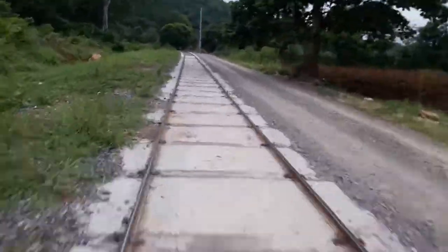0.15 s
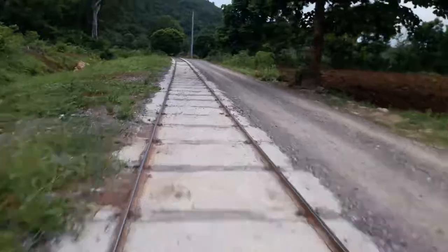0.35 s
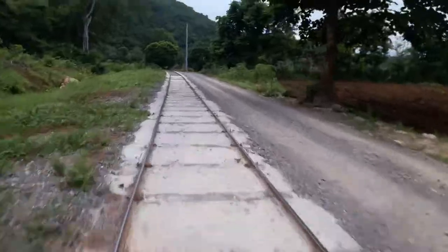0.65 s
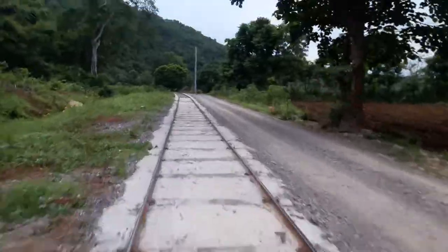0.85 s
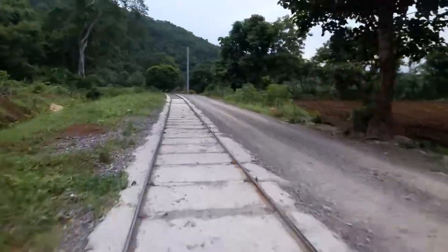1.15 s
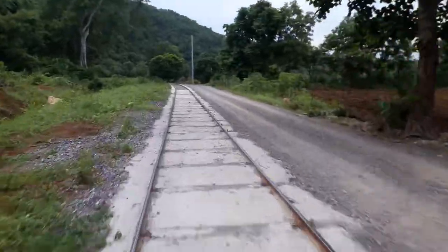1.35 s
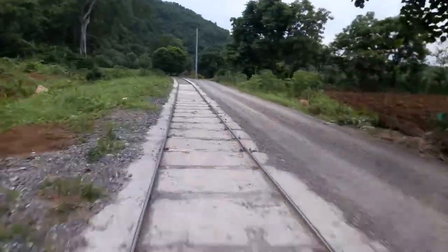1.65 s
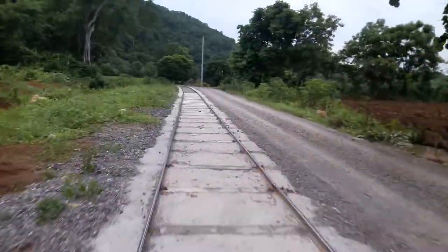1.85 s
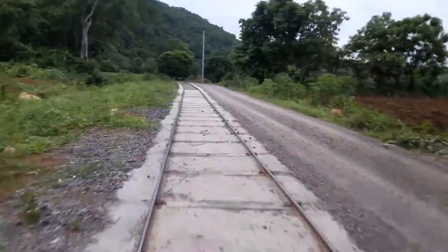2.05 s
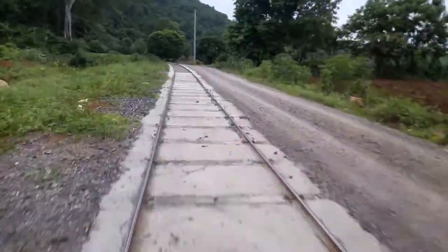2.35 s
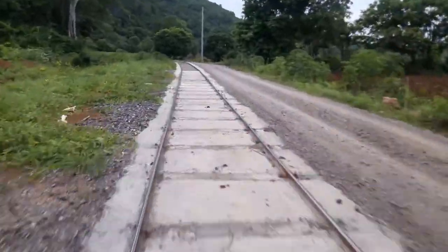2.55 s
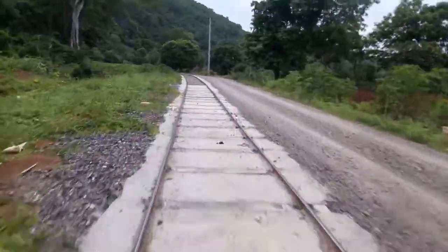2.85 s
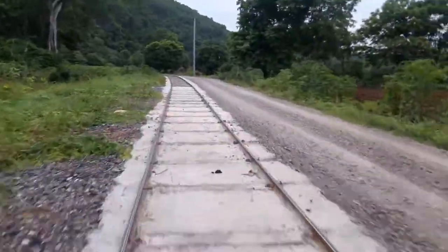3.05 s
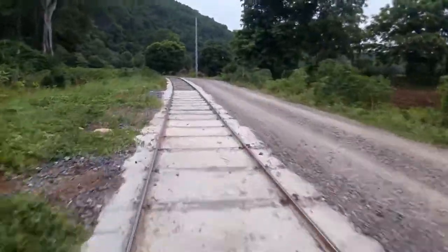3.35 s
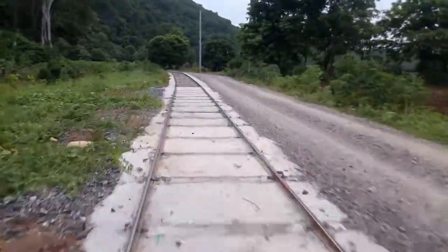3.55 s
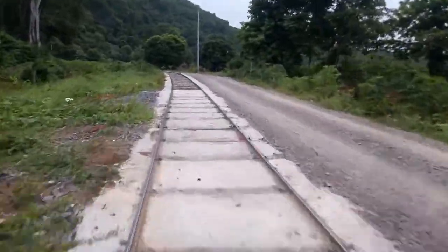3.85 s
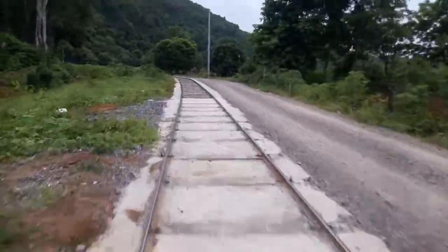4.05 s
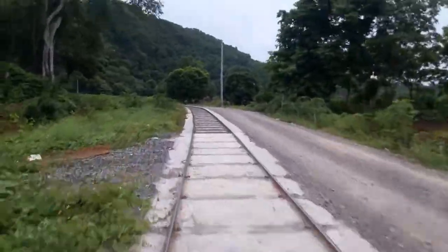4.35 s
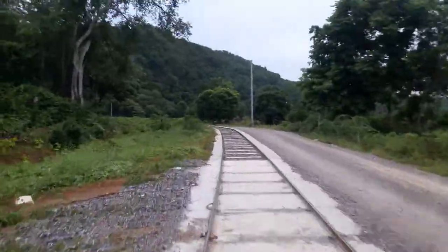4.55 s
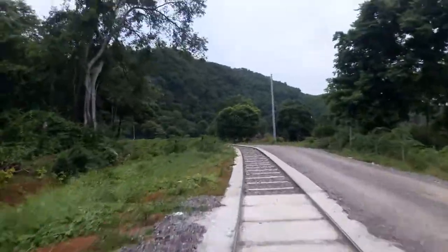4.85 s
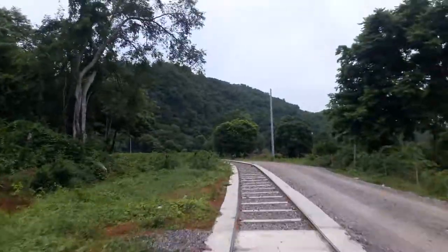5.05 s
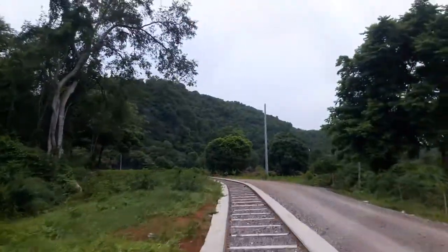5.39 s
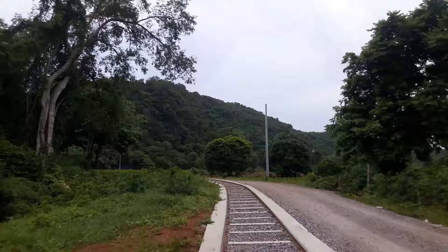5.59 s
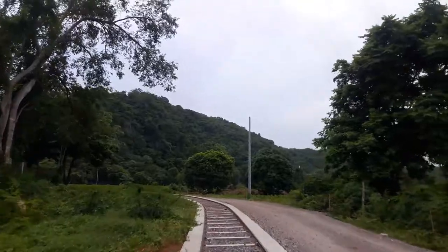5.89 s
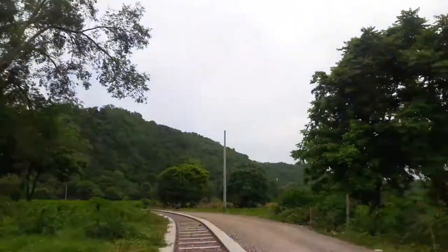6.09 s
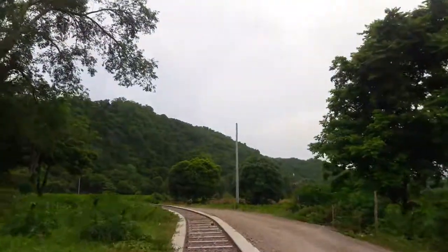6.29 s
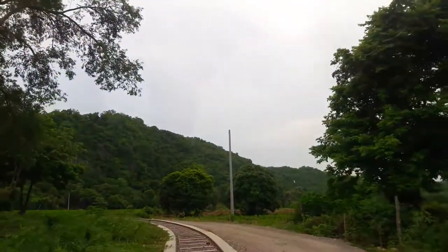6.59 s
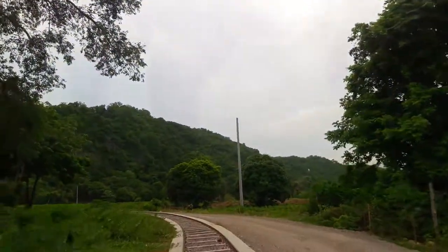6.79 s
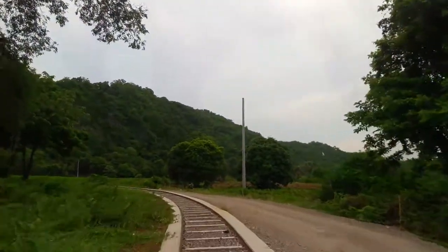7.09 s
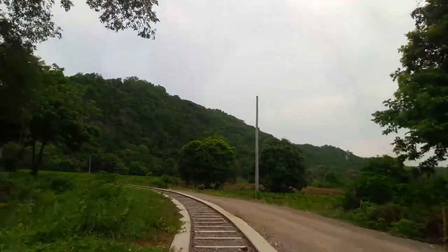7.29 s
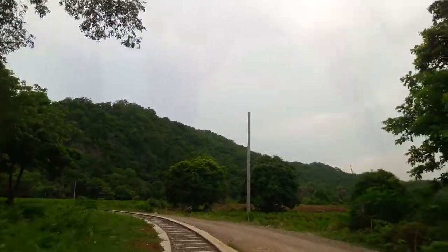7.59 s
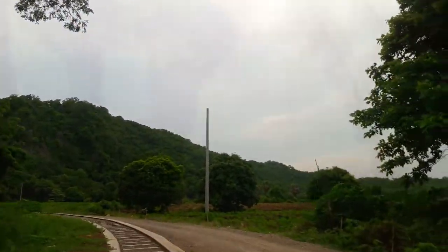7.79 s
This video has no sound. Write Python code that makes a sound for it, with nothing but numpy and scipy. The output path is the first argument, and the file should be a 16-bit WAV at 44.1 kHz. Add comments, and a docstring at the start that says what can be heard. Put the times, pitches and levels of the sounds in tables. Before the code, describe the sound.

Continuous low, dull rolling of steel wheels on rails, close and outdoors, with little treble. Thuds and small metallic clacks come unevenly, many per second. The ride quiets slightly, then a loose fitting rattles, the frame drone rises, a very faint thin squeal passes in the bend, and a rough jolt booms and buzzes before the heavy rumble carries on.

```python
"""A small open rail cart rolls on steel wheels: deck rumble, frame drone and tread hiss are shaped noise.
Decaying frame modes make the bumps, about eight a second; noise bursts through wheel modes make the clacks.
A loose part buzzes under uneven taps, a fitting chatters on one bright mode, and the boards boom softly.
Flanges scrape, and squeal thinly in a bend; a faint high rustle comes and goes over a steady hiss.
All is heard through a muffled phone on board, with rounded peaks and no top treble."""
import sys
import numpy as np
from scipy import signal
from scipy.fft import rfft, irfft, next_fast_len
from scipy.io import wavfile
from scipy.ndimage import uniform_filter1d, map_coordinates

SR = 44100
rng = np.random.default_rng(int(sys.argv[2]) if len(sys.argv) > 2 else 0)


def file_out(sig):
    """Save sig as 16-bit WAV at sys.argv[1]."""
    # one column per channel
    cols = np.atleast_2d(sig).T
    # limit, then scale
    lim = np.clip(cols, -1, 1)
    pcm = np.round(lim * 32767).astype(np.int16)
    wavfile.write(sys.argv[1], SR, pcm)


N = 349713

# Rolling over time. Each row: time in seconds, deck rumble in dB, frame drone in dB before a 3 dB cut,
# high tread hiss in dB.
ROLL = [(0.0, -23.5, -28.5, -46), (0.4, -25, -33, -46), (0.84, -27.5, -33, -45), (1.19, -25, -28, -50.5),
        (1.66, -27.5, -33, -48.5), (2.21, -27.5, -30.5, -49), (3.03, -29, -33, -48.5),
        (3.95, -26.5, -33, -52), (4.33, -24.5, -32, -47), (4.73, -25, -26, -45), (5.06, -21.5, -25.5, -44),
        (5.5, -22, -26, -52.5), (6.2, -20.5, -21, -52.5), (6.38, -15, -19.5, -48.5),
        (6.52, -13, -18.5, -44.5), (6.82, -19.5, -22.5, -52), (7.6, -20, -28, -57),
        (7.93, -20.5, -25.5, -50.5)]
# Low part of the tread hiss. Each row: time in seconds, level in dB.
LOW_HISS = [(0.0, -36), (0.66, -36.5), (1.59, -41.5), (1.87, -41.5), (2.54, -44.5), (2.8, -41),
            (4.09, -40.5), (4.44, -40.5), (5.7, -35.5), (6.18, -41), (6.65, -41), (6.98, -38.5),
            (7.77, -39), (7.93, -39.5)]
# Axle thrum. Each row: time in seconds, level in dB.
THRUM = [(0, -38), (1.2, -42), (3.8, -42), (4.7, -36), (7.93, -37)]
# Noise colours of deck, frame drone and treads. Each row: frequency in Hz, relative density in dB.
DECK_COLOUR = [(12, -55), (20, -35), (56, -2.5), (103, -1.5), (134, -1), (167, -2.5), (320, -8.5),
               (420, -34.5), (700, -120)]
DRONE_COLOUR = [(110, -33), (190, -14.5), (366, -1.5), (403, -4), (449, -3), (513, -5.5), (554, -11.5),
                (800, -22.5), (1040, -43), (1760, -120)]
TREAD_COLOUR = [(290, -36), (500, -6), (630, -8.5), (922, -9.5), (1180, -13), (1370, -12), (2700, -18.5),
                (2890, -20), (3380, -35.5), (3610, -36), (4690, -55.5), (7940, -120)]
# Centre pitches of the small ticking fittings, in Hz.
FITTINGS_HZ = [909, 1039, 1415, 1751, 2086, 2750]
# A boom of the boards. Each row: start in seconds, length in seconds, level in dB.
ROUGH_STRETCH = [(6.27, 0.41, -17)]
BOOM_HZ, BOOM_DRIFT_HZ = 189.9, 8.3
BOOM_IDLE_DB, BOOM_IDLE_FOLLOWS = -40, 3.37  # level at mean deck rumble, dB per dB of rumble
# Noise colours of steady hiss, rustle and flange scrape. Each row: frequency in Hz, relative density in dB.
AIR_COLOUR = [(5000, -18.5), (7000, -8.5), (8200, -9), (10000, -5.5), (12000, 1), (14000, 0.5), (15500, -1)]
RUSTLE_COLOUR = [(8000, -38), (10000, -23), (12000, -5.5), (13000, -7), (14000, 0), (15200, 0),
                 (15700, -16)]
SCRAPE_COLOUR = [(2500, -37), (3400, -2), (4400, -3), (5000, -5.5), (6400, -15), (7600, -28), (9000, -60)]
SCRAPE_DB, SCRAPE_FOLLOWS_HISS, SCRAPE_FOLLOWS_DECK = -78, 1.1, 0.58  # mean level, then dB per dB
# Bursts of rustle. Each row: start in seconds, length in seconds, level in dB.
RUSTLES = [(.26, .04, -76.5), (.38, 0.4, -73), (.47, .02, -65.5), (.55, 0.069, -61), (1.52, 0.026, -75.5),
           (3.78, 0.029, -78), (4.18, 0.037, -72), (4.32, 0.031, -71), (4.44, 0.039, -74),
           (5.04, 0.065, -73)]
RUSTLE_IDLE_DB = -92.5
# Modes of the loose part. Each row: pitch in Hz, width in Hz of each of two filter passes, relative level in dB.
LOOSE_MODES = [(3635, 210, 1.5), (4370, 240, -12), (10400, 400, -24), (11400, 450, -19)]
# Buzzes of the loose part. Each row: start in seconds, length in seconds, drive in dB before a 4 dB cut.
BUZZES = [(.09, .03, -63), (.2, .03, -64), (.55, 0.043, -59.5), (1.8, 0.024, -64), (3.18, 0.017, -67),
          (3.228, 0.015, -64), (3.354, 0.01, -62), (3.61, .03, -69), (3.73, 0.013, -71), (3.84, 0.023, -64),
          (3.953, 0.01, -61), (4.37, .02, -58), (4.44, .025, -67.5), (4.6, 0.0099, -68), (4.67, .02, -65),
          (4.78, .015, -63), (5.07, .015, -65), (5.24, 0.034, -59), (5.31, .02, -68), (5.51, .015, -63),
          (5.995, 0.035, -70), (6.085, .05, -67), (6.235, 0.09, -63), (6.33, 0.34, -53), (6.75, 0.048, -60),
          (6.86, 0.016, -62.5), (7.86, 0.087, -65)]
BUZZ_IDLE_DB = -80.5  # drive between buzzes, before the same cut
# The loose part's second mode alone. Each row: start in seconds, length in seconds, level in dB.
CHIRPS = [(.54, 0.061, -66), (.655, .015, -74), (.79, .015, -70), (2.57, .05, -76), (3.905, 0.012, -75)]
CHIRR_S, CHIRR_PER_S, CHIRR_DB = 6.36, 10.3, 6  # hard shaking: time of one pulse, rate, half of its swing
# Knocks of a fitting. Each row: time in seconds, starting level in dB before the attack, pitch in Hz.
CHATTERS = [(3.705, -47, 2600), (3.7384, -37, 2670), (3.7653, -43, 2690), (3.8028, -36, 2740),
            (3.825, -32, 2600), (3.8537, -34, 2830), (3.885, -32, 2800), (3.915, -36, 2640),
            (3.9564, -36.5, 2680), (4.4712, -35, 2760), (4.4912, -36, 2700)]
CHATTER_HZ, CHATTER_WIDTH_HZ, CHATTER_PER_S = 2630, 170, 63  # the faint taps: mode, filter width, rate
CHATTER_T60_S, CHATTER_IDLE_DB = 0.037, -69
# Wheel bumps. Each row: time in seconds, strength in dB before a 4 dB cut, strongest pitch in Hz,
# low thud in dB before a 0.5 dB cut.
BUMPS = [(0.096, -3.5, 379, -23), (0.238, -9.5, 350, -25), (0.341, -9.5, 358, -31), (0.365, -15, 330, -20),
         (0.473, -8.5, 290, -16), (0.538, -14.5, 352, -21.5), (0.74, -9, 314, -13.5),
         (0.882, -8.5, 268, -23), (0.975, -11, 334, -19), (1.016, -11, 344, -21), (1.108, -6.5, 239, -35.5),
         (1.19, -10, 250, -38), (1.226, -10.5, 238, -32), (1.283, -10.5, 304, -24), (1.355, -8.5, 257, -34),
         (1.39, -11, 370, -25), (1.64, -13, 270, -15.5), (1.76, -9, 240, -21.5), (2.021, -11.5, 470, -20.5),
         (2.438, -10.5, 227, -33), (2.54, -19, 280, -15.5), (2.889, -15, 348, -18.5),
         (3.172, -11, 302, -31), (3.298, -9, 230, -23), (3.423, -3.5, 288, -11.5), (3.564, -14, 336, -31.5),
         (3.664, -8.5, 325, -30), (3.701, -15.5, 304, -18.5), (3.784, -7, 407, -19),
         (4.066, -10.5, 338, -19), (4.144, -26.5, 446, -15), (4.322, -7, 330, -10.5),
         (4.464, -13, 277, -24), (4.555, -11, 269, -28), (4.71, -9, 444, -28), (4.952, -8, 364, -16.5),
         (5.079, -7, 422, -25), (5.137, -15, 460, -18.5), (5.193, -17.5, 285, -38), (5.208, -9, 385, -5.5),
         (5.303, -25.5, 346, -19), (5.45, -5.5, 334, -10), (5.484, -7.5, 428, -16), (5.6, -8, 321, -13.5),
         (5.72, -4, 252, -17), (5.867, -5.5, 470, -16), (5.97, -14.5, 480, -26), (5.988, -7, 330, -13.5),
         (6.118, -14.5, 295, -6), (6.273, -0.5, 232, -14.5), (6.347, -6.5, 285, -13.5),
         (6.51, -3, 330, -14.5), (6.629, -33, 262, -8.5), (6.681, -8, 240, -11.5), (6.747, -4, 307, -12),
         (6.992, -3.5, 319, -27), (7.049, -7.5, 230, -8.5), (7.111, -10, 343, -22.5), (7.272, -4, 243, -27),
         (7.448, -36, 240, -18), (7.56, 1, 262, -13.5), (7.692, -3.5, 233, -31), (7.809, -2.5, 263, -8)]
# Frame modes. Each row: pitch in Hz, decay time as a share of BUMP_T60_S.
FRAME_MODES = [(136, 1.9), (200, 0.8), (240, 1.0), (275, 0.77), (310, 0.86), (358, 1.26), (445, 1.55),
               (520, 1.2)]
BUMP_T60_S = 0.09
AFTERSHAKE_DB, AFTERSHAKE_T60_S = 19, .3  # dB taken off a bump's strength to stir the drone, decay
# Wheel on rail. Each row: time in seconds, level of the blow's noise in dB, brightness above 3300 Hz in dB,
# wheel ring in Hz, ring gain in dB, contact length in seconds.
CLACKS = [(0.454, -48, 10, 1780, 16, 0.081), (0.663, -34, -3, 1770, 4, 0.0039),
          (0.741, -30, 0, 2600, 8, 0.0095), (0.813, -42.5, -5.5, 1730, 11, 0.0053),
          (0.87, -53, -1, 1740, 16, 0.0051), (0.975, -29.5, 9, 1640, 4, 0.0048),
          (1.641, -31, -4.5, 1880, 4, 0.0071), (1.812, -39.5, 3, 1650, 9, 0.0053),
          (2.093, -39, 1, 1970, -6, 0.0051), (2.333, -40, -3, 2500, 3, 0.012),
          (2.531, -41.5, -1, 1340, 16.5, 0.0051), (2.738, -39.5, -3.5, 2000, -3, 0.012),
          (2.971, -40, 0, 2610, -7, 0.016), (3.008, -40, -9, 1135, 13, 0.0045),
          (3.4238, -37, -4, 1670, 12, 0.012), (3.484, -41, 3, 2620, -2, 0.007),
          (3.654, -41.5, 0, 1440, 16.5, 0.0055), (3.831, -37, -8, 1690, 13, 0.009),
          (4.246, -45.5, -7, 1000, 19, 0.0049), (4.315, -32, 0, 1070, 3, 0.014),
          (4.4096, -47.5, 2, 1390, 1, 0.0061), (4.486, -41.5, -8, 1100, 7, 0.025),
          (4.5435, -35.5, -1, 1840, 7, 0.0083), (4.638, -36.5, 1, 1100, 8.5, 0.012),
          (4.73, -38, -2, 1250, 1, 0.029), (4.992, -37, -1.5, 1250, -0.5, 0.0072),
          (5.153, -42.5, 2.5, 1320, 12, 0.017), (5.209, -30.5, 7, 1610, 6, 0.006),
          (5.251, -39, 1, 1150, 9.5, 0.009), (5.44, -42, 7.5, 2600, 0, 0.0087),
          (5.456, -41.5, 9.5, 1200, 17.5, 0.019), (6.185, -39.5, 6.5, 1490, 9, 0.0051),
          (6.2744, -38.5, 0, 1800, 4, 0.0094), (6.314, -38, 3, 1780, 5.5, 0.0099),
          (6.401, -39, 2, 2100, 11, .008), (6.51, -38.5, -2, 2300, 1, 0.0097),
          (6.55, -41, 0.5, 1750, 8.5, 0.027), (6.632, -36, 15.5, 1810, 14, 0.0058),
          (6.7487, -36, 3.5, 1470, 3, .01), (7.101, -41, 0, 1030, 16, 0.0066)]
# Muffled clack colour before brightness. Each row: frequency in Hz, relative gain in dB.
CLACK_COLOUR = [(300, -11), (600, 12.5), (1200, 1.5), (2900, -3.5), (3500, -22), (5000, -38), (7000, -62),
                (10000, -110)]
CLACK_T60_S, CLACK_ATTACK_S = 0.058, .0018
WHEEL_WIDTH_HZ, OTHER_WIDTH_HZ, OTHER_DB = 110, 70, 2  # main ring, then other wheel modes and their gain
# Flanges in the bend. Each row: time in seconds, level in dB, pitch in Hz.
SQUEAL = [(4.15, -105, 6800), (4.35, -93, 6700), (4.8, -87.5, 6500), (5.25, -82.5, 6300),
          (5.45, -105, 6400)]
TOP_HZ = 15720


def amp(db):
    """Gain of a level in dB."""
    return 10 ** (np.asarray(db) / 20)


def unit(x):
    """x at rms 1."""
    return x / np.sqrt(np.mean(x ** 2) + 1e-20)


def along(points, hz):
    """Value at hz of (Hz, value) points joined on a log frequency axis."""
    f, v = np.transpose(points)
    return np.interp(np.log(hz + 1), np.log(f + 1), v)


def curves(rows):
    """One value per sample for each column after the time."""
    s, *cols = np.transpose(rows)
    return [np.interp(np.arange(N) / SR, s, c) for c in cols]


def swing(db):
    """A level curve about its mean."""
    return db - db.mean()


def wobble(rate):
    """A smooth random curve, rate knots a second."""
    knots = rng.standard_normal(int(N * rate / SR) + 4)
    return map_coordinates(knots, [np.arange(N) * rate / SR])


def filtered(x, response):
    """x times a complex response of frequency."""
    m = next_fast_len(len(x) + 8192)
    return irfft(rfft(x, m) * response(np.fft.rfftfreq(m, 1 / SR)), m)[:len(x)]


def resonance(f, hz, width_hz):
    """A causal resonance of peak gain 1."""
    return 1j * f * width_hz / (hz * hz - f * f + 1j * f * width_hz)


def split(x, edge_hz):
    """The parts of x below and above an edge, each at rms 1."""
    low = filtered(x, lambda hz: 1 / (1 + (hz / edge_hz) ** 4))
    return unit(low), unit(x - low)


def rush(spectrum, patchy_db):
    """Coloured noise of rms 1 with patches of random gain in time and frequency."""
    z = signal.stft(rng.standard_normal(N), nperseg=512)[2]
    across_bins = uniform_filter1d(rng.standard_normal(z.shape), size=5, axis=0)
    field = uniform_filter1d(across_bins, size=8, axis=1)
    noise = signal.istft(z * amp(patchy_db * unit(field)), nperseg=512)[1][:N]
    return unit(filtered(noise, lambda hz: amp(along(spectrum, hz))))


def bursts(rows, idle_db, attack_s, release_s):
    """Gain of an idling source with (start, length, dB) bursts: attack, hold, release."""
    t, power = np.arange(N) / SR, amp(2 * idle_db)
    for s, length, db in rows:
        edges = np.minimum((t - s) / attack_s, (s + length - t) / release_s)
        power = power + amp(2 * db) * np.exp(np.minimum(edges, 0))
    return np.sqrt(power)


def hard_shake():
    """Gain that pulses up to 1 while the deck shakes hard and falls off as the rumble weakens."""
    pulse = np.cos(2 * np.pi * CHIRR_PER_S * (np.arange(N) / SR - CHIRR_S)) - 1
    return amp(2.0 * np.minimum(curves(ROLL)[0] + 14.0, 0) + CHIRR_DB * pulse)


def rolling():
    """Rough rail shakes axles, deck and frame; the treads hiss and rattle, beating once a wheel turn."""
    deck_db, drone_db, high_db = curves(ROLL)
    thrum_db = curves(THRUM)[0] + 2.5 * wobble(11)
    low_db, = curves(LOW_HISS)
    thrum, deck = split(rush(DECK_COLOUR, patchy_db=-0.55), edge_hz=94.0)
    treads = rush(TREAD_COLOUR, patchy_db=1.5) + amp(-7.0) * rattles()
    low, high = split(treads, edge_hz=1267)
    turn = np.sin(2 * np.pi * np.cumsum(9.4 + 0.23 * wobble(0.4)) / SR)  # wheel turns a second
    grit = amp(0.22 * turn + 0.78 * wobble(22) + 0.6 * wobble(70))
    body = amp(thrum_db) * thrum + amp(deck_db + 0.8 * wobble(18)) * deck
    drone_gain = amp(drone_db - 3.0 + 1.4 * wobble(13)) * aftershake(drone_db)
    drone = drone_gain * rush(DRONE_COLOUR, patchy_db=1.34)
    return body + drone + grit * (amp(low_db) * low + amp(high_db) * high)


def rattles():
    """Small fittings tick near their own pitches, each ringing a few hundredths of a second."""
    luck = rng.random((int(90 * N / SR), 4))  # 90 ticks a second: when, which fitting, size, detune
    t = np.arange(SR // 28)
    which = (luck[:, 1:2] * len(FITTINGS_HZ)).astype(int)
    hz = np.array(FITTINGS_HZ)[which] * (1 + 0.18 * (luck[:, 3:] - .5))
    size_db = along(TREAD_COLOUR, hz) - 3.2 * np.log(luck[:, 2:3] + 0.02)
    attack = 1 - np.exp(-t / SR / .002)
    rings = amp(size_db - 60 * t / SR / .05) * np.sin(2 * np.pi * hz * t / SR) * attack
    at = (luck[:, :1] * N).astype(int) + t
    return unit(np.bincount(at.ravel(), rings.ravel(), minlength=N)[:N])


def aftershake(drone_db):
    """Gain of the frame drone, which leaps at each bump and settles again."""
    s, db = np.transpose(BUMPS)[:2]
    kicks = np.zeros(N)
    kicks[(s * SR).astype(int)] = amp(2 * (db - AFTERSHAKE_DB))  # as power
    t = np.arange(SR // 2) / SR
    rise = 1 - np.exp(-(t / .008) ** 2)
    settle = rise * amp(-120 * t / AFTERSHAKE_T60_S)
    stirred = np.abs(signal.fftconvolve(kicks, settle)[:N])
    return np.sqrt(1 + stirred / amp(2 * drone_db))


def boom():
    """The boards boom: a narrow band of noise around a drifting pitch."""
    follow_db = BOOM_IDLE_FOLLOWS * np.minimum(swing(curves(ROLL)[0]), 4.5)
    phase = 2 * np.pi * np.cumsum(BOOM_HZ + BOOM_DRIFT_HZ * wobble(10)) / SR
    level = bursts(ROUGH_STRETCH, BOOM_IDLE_DB + follow_db, attack_s=0.013, release_s=0.046)
    return level * unit(wobble(45) * np.cos(phase) + wobble(45) * np.sin(phase))


def treble():
    """A steady faint hiss under a crackly rustle and the thin scrape of the flanges, all shaped noise."""
    deck_db, _, high_db = curves(ROLL)
    scrape_db = SCRAPE_DB + SCRAPE_FOLLOWS_HISS * swing(high_db) + SCRAPE_FOLLOWS_DECK * swing(deck_db)
    crackle = amp(2.5 * wobble(40) + 1.5 * wobble(300))
    rustle_gain = bursts(RUSTLES, RUSTLE_IDLE_DB, attack_s=.007, release_s=.01)
    rustle = rustle_gain * unit(crackle * rush(RUSTLE_COLOUR, patchy_db=3.0))
    # the scrape's band also swells with each rustle and with hard shaking
    scrape_gain = amp(scrape_db + 0.9 * wobble(28)) + amp(-9.5) * rustle_gain + amp(-69.0) * hard_shake()
    scrape = scrape_gain * rush(SCRAPE_COLOUR, patchy_db=1.5)
    air = amp(-80.5) * rush(AIR_COLOUR, patchy_db=0.8)
    return air + rustle + scrape


def loose_part():
    """Tiny uneven contacts ring a loose part; in its buzz the upper modes wake when the deck shakes hard."""
    taps = (rng.random(N) < 2600 / SR) * rng.standard_normal(N)  # about 2600 a second
    modes = []
    for hz, width_hz, db in LOOSE_MODES:
        ring = filtered(taps, lambda f: resonance(f, hz, width_hz) ** 2)
        modes.append(amp(db) * unit(ring))
    # the lowest mode half sings, half rasps
    lowest_hz, _, lowest_db = LOOSE_MODES[0]
    whistle = np.sin(2 * np.pi * np.cumsum(lowest_hz + 40.0 * wobble(110)) / SR)
    lowest = amp(lowest_db) * unit(whistle + 0.85 * unit(modes[0]))
    upper = amp(3.0) * hard_shake() * sum(modes[1:])
    drive = bursts(BUZZES, BUZZ_IDLE_DB + 6 * wobble(25), attack_s=.004, release_s=0.0061)
    buzz = drive * amp(-4.0 + 1.8 * wobble(53)) * (lowest + upper)
    chirp = bursts(CHIRPS, idle_db=-100, attack_s=.006, release_s=.012) * unit(modes[1])
    return chirp + buzz


def chatter():
    """A fitting knocks as decaying tones, over sparse faint taps on one bright mode."""
    taps = (rng.random(N) < CHATTER_PER_S / SR) * (1 + rng.random(N))
    ringing = filtered(taps, lambda f: resonance(f, CHATTER_HZ, CHATTER_WIDTH_HZ) ** 2)
    out = amp(CHATTER_IDLE_DB) * unit(ringing)
    t = np.arange(SR // 10) / SR
    attack = 1 - np.exp(-t / 0.0025)
    for s, db, hz in CHATTERS:
        knock = amp(db - 60 * t / CHATTER_T60_S) * np.sin(2 * np.pi * hz * t) * attack
        out[round(s * SR):][:len(t)] += knock
    return out


def bumps():
    """A bump rings the frame modes near its pitch and thuds in the lowest ones."""
    out, t = np.zeros(N + SR), np.arange(SR // 4) / SR
    hz, ring_share = np.transpose(FRAME_MODES)[:, :, None]
    fall_db = -60 * t / (ring_share * BUMP_T60_S)
    attack = 1 - np.exp(-(t / 0.003) ** 2)
    for s, db, peak_hz, thud_db in BUMPS:
        level_luck, pitch_luck = rng.standard_normal((2, len(FRAME_MODES), 1))
        ring_db = db - 4.0 - 24 * np.abs(np.log2(hz / peak_hz))  # falls 24 dB an octave off the pitch
        level_db = np.where(hz > 230, ring_db, thud_db - 0.5)
        tones = np.sin(2 * np.pi * hz * (1 + 0.025 * pitch_luck) * t)
        ring = amp(level_db + 1.6 * level_luck + fall_db) * tones
        out[round(s * SR):][:len(t)] += ring.sum(0) * attack
    return out[:N]


def clacks():
    """Wheel on rail: noise held for the contact, one wheel resonance standing out, a few others ringing on."""
    out, t = np.zeros(N + SR), np.arange(SR // 8) / SR
    attack = 1 - np.exp(-(t / CLACK_ATTACK_S) ** 2)
    for s, db, bright_db, ring_hz, ring_db, length in CLACKS:
        noise = rng.standard_normal(len(t))
        others_hz = 800 * 3.3 ** rng.random(5)  # new for each clack

        def colour(f):
            return amp(along(CLACK_COLOUR, f) + bright_db * (f > 3300))

        def ringing(f):
            main = amp(ring_db) * resonance(f, ring_hz, WHEEL_WIDTH_HZ)
            others = sum(resonance(f, hz, OTHER_WIDTH_HZ) for hz in others_hz)
            return colour(f) * (1 + main + amp(OTHER_DB) * others)

        gain = amp(db) / np.std(filtered(noise, colour))
        blow = noise * amp(-60 * np.maximum(t - length, 0) / CLACK_T60_S) * attack
        out[round(s * SR):][:len(t)] += gain * filtered(blow, ringing)
    return out[:N]


def squeal():
    """A thin, fuzzy line that sinks in pitch as the flanges rub through the bend."""
    squeal_db, hz = curves(SQUEAL)
    phase = 2 * np.pi * np.cumsum(hz) / SR
    line = unit(wobble(260) * np.cos(phase) + wobble(260) * np.sin(phase))
    return amp(squeal_db + 5 * wobble(25)) * line


def scene():
    """Everything reaches one microphone in the open air."""
    ride = rolling() + boom() + treble()
    parts = loose_part() + chatter()
    wheels = bumps() + clacks() + squeal()
    return (ride + parts + wheels)[None]


def record(dry):
    """The phone's input rounds off the highest peaks and keeps nothing above its band limit."""
    soft = dry[0] / (1 + np.abs(dry[0] / 0.9) ** 4) ** (1 / 4)
    return filtered(soft, lambda hz: hz < TOP_HZ)[None]


dry = scene()
out = record(dry)
file_out(out)
```